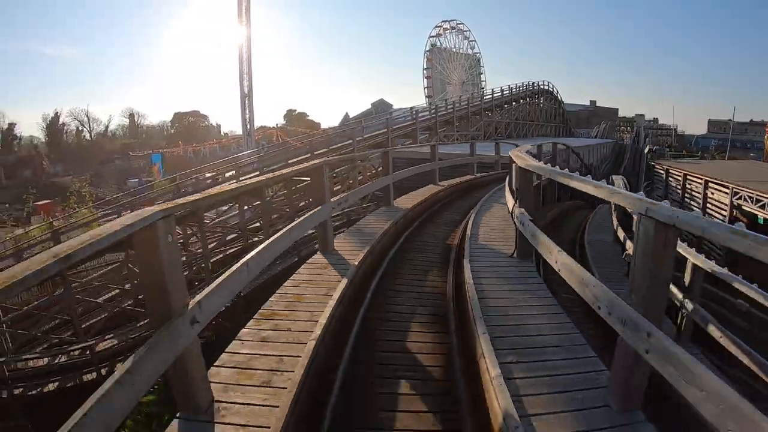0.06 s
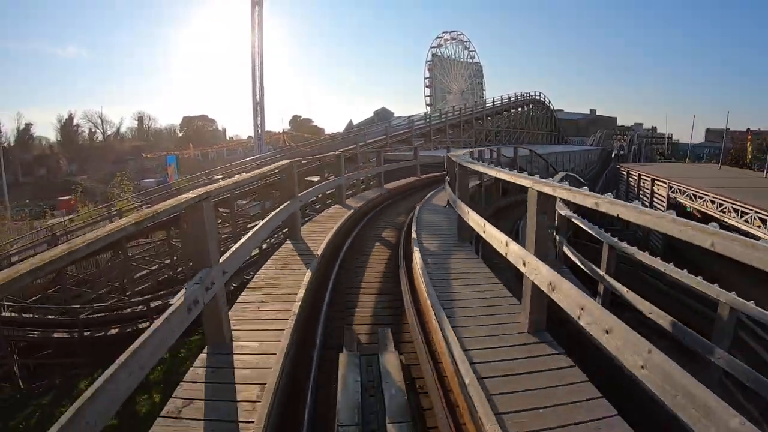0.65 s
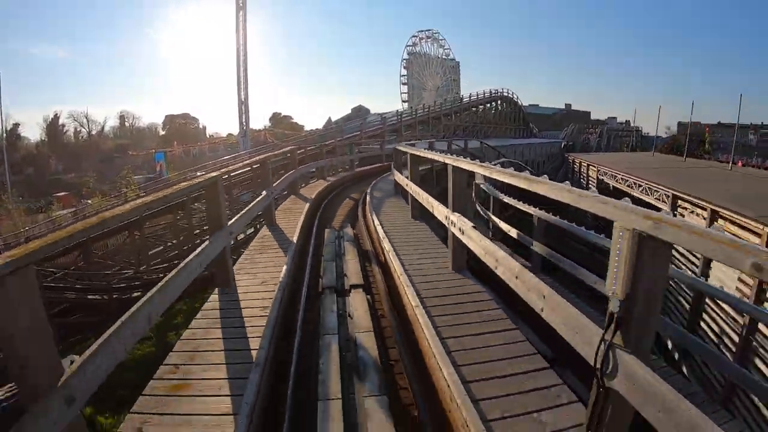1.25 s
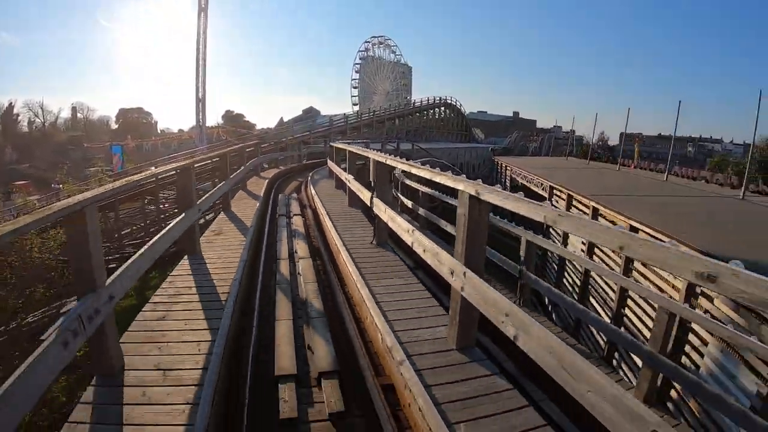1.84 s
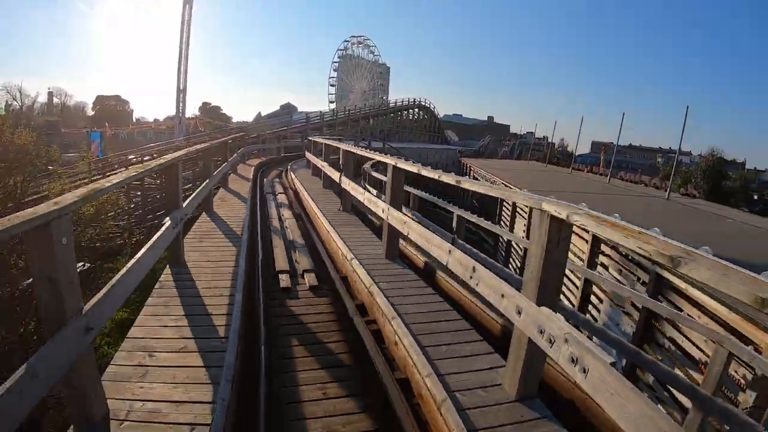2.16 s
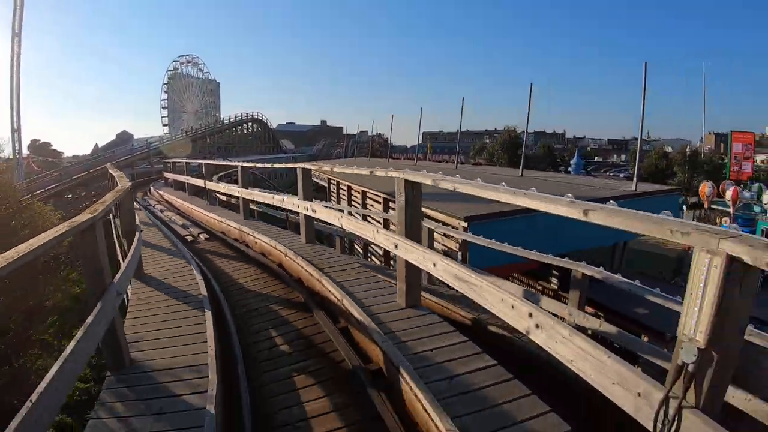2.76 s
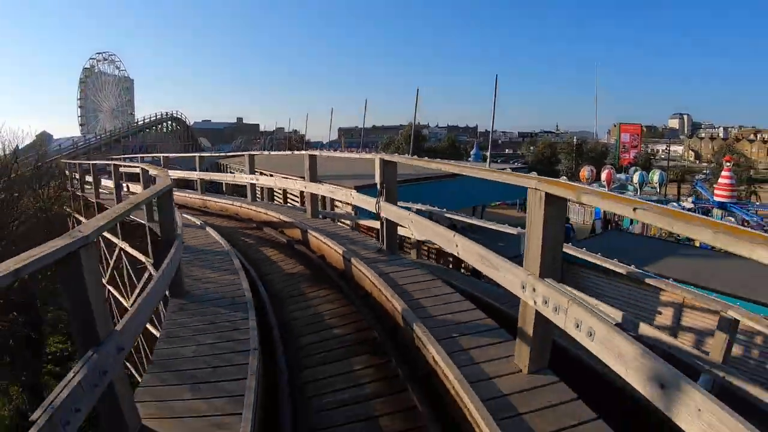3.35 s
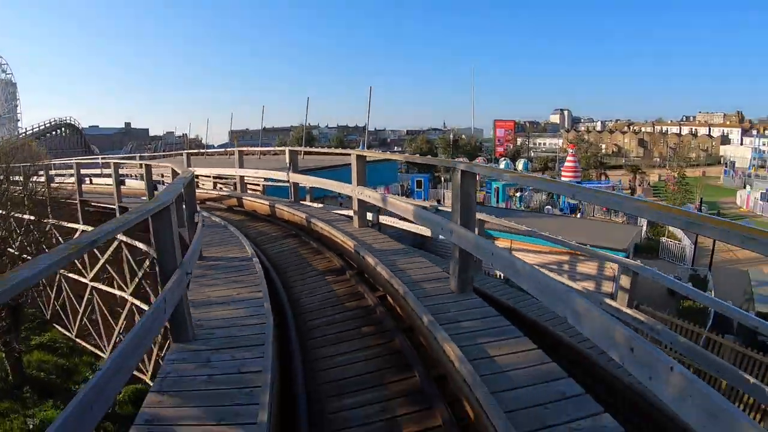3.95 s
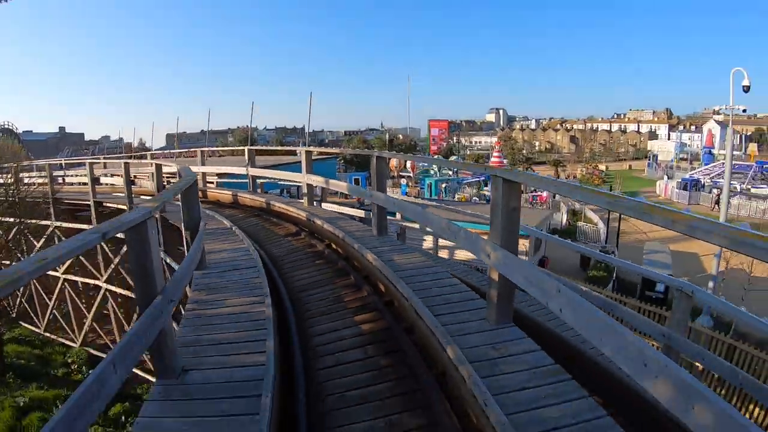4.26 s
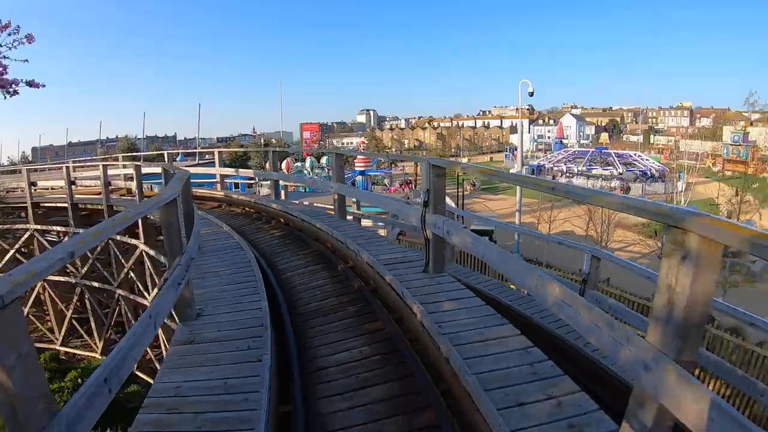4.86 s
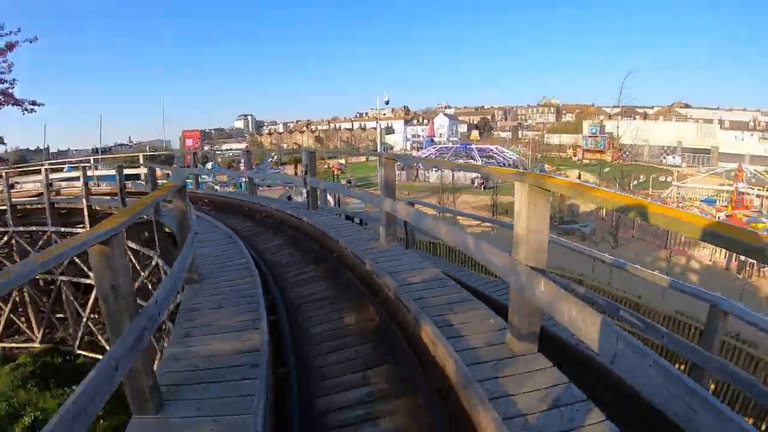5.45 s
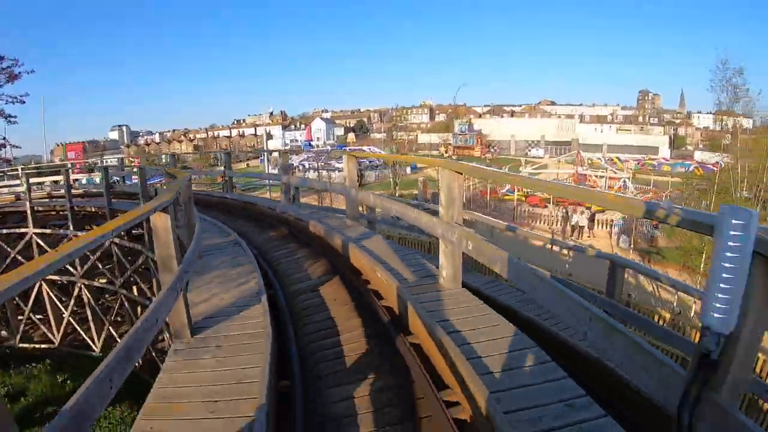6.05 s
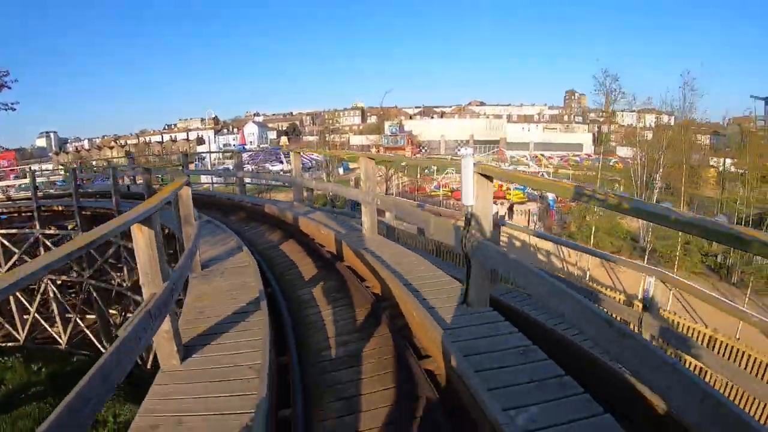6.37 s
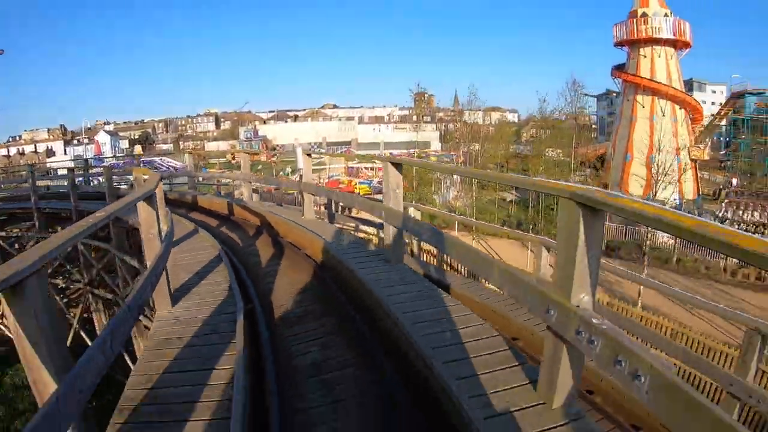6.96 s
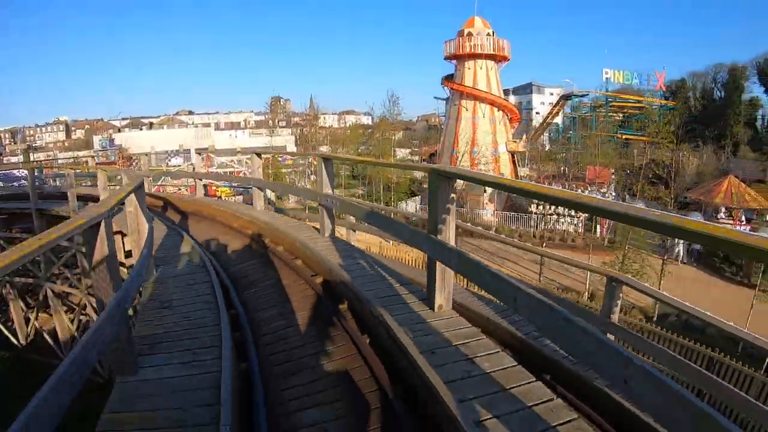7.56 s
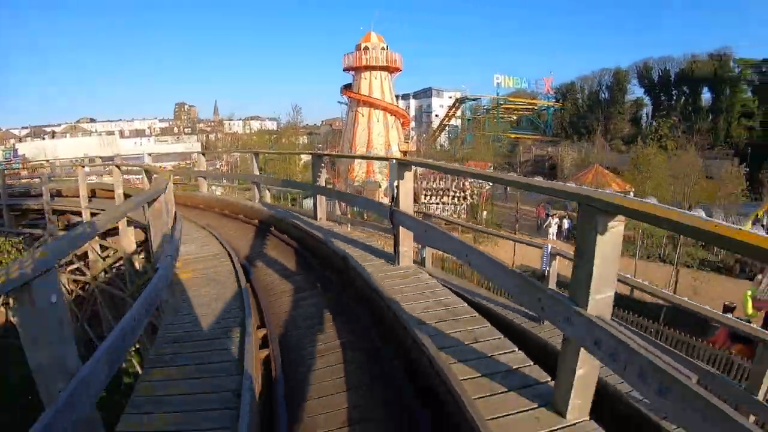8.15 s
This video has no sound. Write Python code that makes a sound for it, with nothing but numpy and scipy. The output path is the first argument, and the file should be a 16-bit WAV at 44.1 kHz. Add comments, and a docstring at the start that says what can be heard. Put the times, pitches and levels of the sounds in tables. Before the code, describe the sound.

From start to finish, about eight seconds, a wooden roller coaster car rumbles along its track, heard from on board in the open air. A hollow, juddering boom from the car's body sits under the gritty roar of steel wheels, and low gusts thud on the microphone, calmer from about 2.3 to 5.5 seconds. Irregular wooden clacks come several times a second, strongest near 0.2, 0.7, 1.7 and 7.6 seconds. Loose metal fittings tick and rattle lightly, most around 1.2 to 2 seconds, where a faint steel sizzle also appears. A wheel gives one brief squeak at the very start. From about 3 seconds it squeals on the bend in fluttering spurts, holding nearly one high pitch. The squeal is loudest from 6 to 7.2 seconds, then weakens and lingers while the rumble and wind continue to the end.

```python
"""Buffeting air, a hollow boom and a juddering wheel roar: the front seat of a wooden roller coaster.
Eddies thud on the microphone, the track shakes the car's body, and steel wheels grind on the rails.
The car clacks over the track while loose fittings rattle and tick and brushing steel sizzles.
Round the bend a wheel flange sticks and slips on the curved rail, squealing in spurts."""
import sys
import numpy as np
from scipy import signal
from scipy.fft import rfft, irfft, next_fast_len
from scipy.io import wavfile
from scipy.ndimage import uniform_filter1d, map_coordinates

SR = 44100
rng = np.random.default_rng(int(sys.argv[2]) if len(sys.argv) > 2 else 0)


def transcribe(u):
    """Save the signal u as a 16-bit wav file named by the first command-line argument.

    u: samples, shape (n,) or (channels, n), limited to [-1, 1]; the rate is SR.
    q: integer samples, one column per channel.
    """
    v = np.clip(np.atleast_2d(u).T, -1, 1)
    q = np.round(v * 32767).astype(np.int16)
    wavfile.write(sys.argv[1], SR, q)


N = 362061

# Tone colours of the noise layers: f/Hz, relative level/dB
BUFFET_SPECTRUM = [(12, -24), (25, -3), (42, 3.5), (70, 2.5), (100, 4.5), (140, -2.5), (400, -58),
                   (1500, -120)]
BOOM_SPECTRUM = [(50, -40), (105, -27.5), (125, -9.5), (145, -3.5), (162, 0.5), (178, -1), (198, 0),
                 (222, -2.5), (245, -5), (278, -10.5), (305, -11.5), (345, -19.5), (450, -21), (600, -30),
                 (1200, -56), (3000, -120)]
PANEL_SPECTRUM = [(180, -29), (260, -4.5), (305, 2), (345, -2), (450, -4), (560, -15), (800, -28.5),
                  (2000, -120)]
ROAR_SPECTRUM = [(150, -24.5), (300, -2), (450, 3.5), (600, -0.5), (820, 2.5), (1050, -1), (1350, -1),
                 (1750, -9.5), (2400, -19.5), (5000, -50.5), (9000, -120)]
GRIND_SPECTRUM = [(500, -14.5), (1000, -1), (1400, 3), (1900, -1.5), (2500, -4), (3200, -8), (4000, -13),
                  (5000, -19), (6000, -31), (7000, -32.5), (9500, -45), (15000, -82)]
RATTLE_SPECTRUM = [(3000, -11), (5500, -1), (6500, -5.5), (7400, 0.5), (7900, 0.5), (8600, -5), (9200, -14),
                   (10000, -16), (11100, -13), (13000, -18), (15500, -35)]
# Air on the microphone, calmer in mid-bend: t/s, level/dB
BUFFET_FADER = [(0, -25.5), (1.1, -24), (1.85, -24), (2.35, -34.5), (2.85, -32.5), (3.6, -35), (3.85, -28),
                (4.1, -31.5), (4.55, -29), (4.7, -34.5), (5.5, -29.5), (5.88, -23.5), (6.03, -30),
                (6.35, -23), (6.75, -23), (7.35, -24.5), (7.6, -28.5), (8.21, -22.5)]
# How hard the track shakes the car's body and its panels: t/s, level/dB
BOOM_FADER = [(0, -21), (.38, -15), (.55, -16.5), (.85, -15.5), (1.05, -18), (2.1, -16.5), (2.3, -14.5),
              (3.7, -16), (4.6, -16), (5.4, -15.5), (6.4, -16.5), (6.62, -18), (6.73, -27.5), (6.83, -19),
              (7.1, -21), (7.4, -19), (7.57, -15.5), (8, -16), (8.21, -22)]
PANEL_FADER = [(0, -33), (0.45, -31), (0.8, -33), (0.95, -24.5), (1.15, -31), (1.5, -36), (1.8, -30),
               (2.45, -26.5), (2.95, -25.5), (3.15, -28), (4.6, -26.5), (4.95, -31.5), (5.07, -20.5),
               (5.3, -28.5), (6.2, -28), (6.5, -34), (7.05, -31.5), (7.6, -30.5), (8.1, -24.5)]
# Wheels on the running rails: t/s, roar level/dB, grind level/dB
WHEEL_FADERS = [(0, -22.5, -30.5), (.25, -24.5, -31), (.7, -28.5, -32.5), (.8, -27, -33.5),
                (1.17, -29, -34), (1.45, -22, -32.5), (1.7, -22, -31.5), (2.25, -22.5, -32),
                (2.7, -25, -33), (3.85, -28, -33.5), (4, -29, -34.5), (4.35, -27, -33.5),
                (5.05, -25.5, -32.5), (5.32, -26, -35.5), (5.45, -24.5, -34.5), (5.7, -27, -32),
                (6.03, -29.5, -35), (6.25, -25.5, -32), (6.42, -24.5, -31.5), (6.5, -30, -34),
                (6.6, -26, -33), (6.75, -28, -33.5), (7.1, -28, -32), (7.35, -26, -31.5),
                (7.72, -29.5, -34), (7.9, -25.5, -32.5), (8.21, -27.5, -33)]
# Bouts of loose fittings rattling: start/s, end/s, level/dB
RATTLE_BOUTS = [(0.05, 0.35, -55.5), (1.2, 1.42, -60.5), (1.65, 2.05, -58.5), (2.54, 2.6, -55),
                (4.15, 4.47, -60.5), (5.5, 5.75, -59), (6.3, 6.45, -60), (6.85, 7.0, -62.5),
                (7.8, 7.95, -61.5)]
# Overlapping swells of band noise: start/s, end/s, f/Hz, half-width/Hz, level/dB
BAND_SWELLS = [(0.0, 0.37, 430, 69, -28.5), (0.102, 1.3, 760, 200, -29.5), (0.0, 0.9, 1760, 290, -36),
               (1.5, 2.06, 1550, 250, -30.5), (2.0, 2.7, 330, 29, -28.5), (2.15, 3.3, 161, 13, -22.5),
               (2.8, 4.3, 182, 17, -21.5), (3.95, 4.8, 154, 12, -21.5), (3, 5.2, 576, 63, -34.5),
               (3.6, 5.95, 372, 81, -31), (6.8, 7.5, 2100, 99, -43), (6.9, 8.0, 142.4, 11, -27),
               (7.498, 7.8, 193, 17, -17)]
# Blows of the track on the car: t/s, level/dB, thud offset/dB, clink offset/dB
CLACK_CUES = [(0.064, -24, 0, -12), (0.210, -14, -5, -9), (0.262, -20.5, 3, -7), (0.576, -21, -4, -4),
              (0.613, -24, 8.5, -10), (0.719, -15.5, -4, -13), (0.935, -25, 7, -16), (1.184, -27, 7, 4),
              (1.422, -22.5, 3.5, -2), (1.647, -20, 4, 0), (1.700, -14, -2.5, -12), (1.766, -28, 3, -11),
              (1.935, -18.5, -2, -6), (2.177, -18, 3.5, -11), (2.241, -21, 3, -9), (2.452, -22.5, 5, -12),
              (2.562, -23, -7, -6), (2.608, -23.5, 3, -15), (2.946, -22, 0, -10), (3.415, -26, 8, -14),
              (3.849, -22, -3, -8), (4.032, -29, 10.5, -6), (4.262, -23, 2, -7), (4.462, -23.5, 0, 4),
              (4.550, -28, 10.5, 2.5), (4.915, -29, -3, -8), (4.937, -21, -9, -12), (5.051, -20, 3, -12),
              (5.088, -23, 4, -15), (5.499, -25.5, 7, -11), (5.645, -20, -4, -6), (5.787, -24.5, 8, -3),
              (5.892, -22, 8, -13), (6.186, -23, 7, -17), (6.530, -23, 5, -5), (6.753, -20, -3, -6),
              (7.435, -19, 1, -11), (7.590, -14, -1, -14), (7.957, -23, 1, -9), (8.157, -24, 3, -14)]
# Close modes of the squealing wheel: f/Hz, relative level/dB
WHEEL_MODES = [(1207, -4), (1226, -7), (1240, 0), (1253, -8), (1266, -1.5), (1278, -7), (1301, -7)]
# Presses of the flange on the rail: start/s, end/s, level/dB, hardest-driven f/Hz
FLANGE_PRESSES = [(0.097, 0.153, -25.5, 1304), (3.21, 3.29, -26.5, 1283), (3.31, 3.37, -25, 1264),
                  (3.446, 3.534, -25.5, 1310), (3.538, 3.6, -23.5, 1260), (3.79, 3.883, -26.5, 1270),
                  (3.923, 4.021, -23, 1273), (4.298, 4.335, -31, 1240), (4.616, 4.827, -27, 1246),
                  (5.196, 5.234, -24.5, 1205), (5.303, 5.316, -20, 1226), (5.367, 5.389, -20.5, 1224),
                  (5.915, 5.95, -24, 1254), (5.984, 6.04, -17.5, 1254), (6.09, 6.133, -19, 1205),
                  (6.204, 6.27, -25, 1223), (6.442, 6.48, -19, 1226), (6.528, 6.602, -20, 1240),
                  (6.617, 6.798, -17, 1250), (6.843, 6.927, -19, 1242), (6.95, 6.98, -22, 1260),
                  (7.022, 7.157, -21.5, 1248), (7.185, 7.3, -25.5, 1240), (8.046, 8.212, -28.5, 1253)]
# Sustained squeal of the flange leaning on the rail: t/s, level/dB
LEAN_FADER = [(2.7, -45), (3.1, -33), (3.3, -30), (4.2, -29.5), (5.4, -30.5), (5.7, -32.5), (5.9, -26),
              (7.2, -28.5), (7.6, -31.5), (7.78, -33.5), (8.21, -30)]
# The fittings' sharpest ticks: t/s, level/dB
TICK_CUES = [(0.3591, -38.5), (0.6823, -40), (1.2096, -40), (1.2211, -36), (1.2401, -38), (1.2796, -27.5),
             (1.3189, -37), (1.6686, -28.5), (1.735, -32), (1.8365, -31.5), (1.8728, -28.5), (1.9033, -31),
             (1.9757, -23.5), (3.548, -38), (4.3475, -35), (4.426, -30.5), (4.467, -36), (4.557, -34.5),
             (4.996, -38.5), (5.0707, -33), (5.1407, -38.5), (5.2445, -37), (5.3867, -38), (5.5009, -39),
             (5.5813, -37), (5.6521, -33), (5.681, -27), (6.3225, -42.5), (6.3747, -32), (6.425, -38),
             (6.4545, -36), (6.772, -37), (6.8973, -32.5), (6.996, -31.5), (7.4393, -27.5), (7.5757, -37),
             (7.6839, -41), (7.8352, -29), (7.9189, -40)]
# Ring of a small metal fitting: f/Hz, relative level/dB, t60/s
FITTING_MODES = [(4820, 10.5, 0.0039), (5630, 1.5, 0.0087), (7340, 1, 0.013), (8260, 1.5, 0.012),
                 (8830, -3.5, 0.015), (11200, -14.5, .006), (12700, -23, .005)]
# Rubs of steel on steel: start/s, end/s, level/dB, top mode's first f/Hz, its last f/Hz
BRUSH_CUES = [(1.25, 1.554, -65, 8830, 8500), (1.852, 2.124, -60, 8700, 8520),
              (2.151, 2.38, -63, 8530, 8400), (7.458, 8.048, -68, 8620, 8540)]
# Modes of the brushed steel before their pitch shift: f/Hz, half-width/Hz, relative level/dB
BRUSH_MODES = [(7450, 300, -8), (8250, 200, -7), (8500, 170, -0.5)]


def amp(db):
    """Decibels to gain."""
    return 10 ** (np.asarray(db) / 20)


def unit(x):
    """Scale to rms 1."""
    return x / np.sqrt(np.mean(x ** 2) + 1e-20)


def curves(rows):
    """One per-sample automation curve for each column after the time."""
    times, *columns = np.transpose(rows)
    return [np.interp(np.arange(N) / SR, times, column) for column in columns]


def wobble(rate):
    """A smooth random modulator with rate knots a second."""
    return map_coordinates(rng.standard_normal(int(N * rate / SR) + 4), [np.arange(N) * rate / SR])


def filtered(x, response):
    """Equalise x with a gain given as a function of frequency."""
    size = next_fast_len(N + SR // 2)
    return irfft(rfft(x, size) * response(np.fft.rfftfreq(size, 1 / SR)), size)[:N]


def noise(spectrum, grit=0):
    """White noise plus any grit, shaped by a spectrum on a log frequency axis, at rms 1."""
    points_hz, db = np.transpose(spectrum)
    source = rng.standard_normal(N) + grit
    return unit(filtered(source, lambda hz: amp(np.interp(np.log(hz + 1), np.log(points_hz), db))))


def resonance(centre_hz, half_width_hz):
    """A resonant band of noise, at rms 1."""
    white = rng.standard_normal(N)
    return unit(filtered(white, lambda hz: 1 / (1 + ((hz - centre_hz) / half_width_hz) ** 2)))


def steady(x, seconds):
    """Level out the slow swells of x, holding it near rms 1."""
    size = max(int(seconds * SR), 8)
    power = uniform_filter1d(uniform_filter1d(x ** 2, size), size)
    return x / np.sqrt(np.abs(power) + 1e-12)


def patchy(x, depth_db):
    """Let the colour of x drift over a few hundred Hz and a tenth of a second, at rms 1."""
    spectrogram = signal.stft(x, nperseg=1024)[2]
    drift = rng.standard_normal(spectrogram.shape)
    for _ in range(2):
        drift = uniform_filter1d(uniform_filter1d(drift, size=5, axis=0), size=9, axis=1)
    return unit(signal.istft(spectrogram * amp(depth_db * unit(drift)), nperseg=1024)[1][:N])


def impacts(per_second, spread_db):
    """Tiny random impacts of varying size, at rms 1."""
    struck = rng.random(N) < per_second / SR
    polarity = np.sign(rng.standard_normal(N))
    return unit(struck * polarity * amp(spread_db * np.clip(rng.standard_normal(N), -2, 2)))


def swells(rows, rise_s, fall_s):
    """Envelope of cues (start/s, end/s, level/dB): each rises, holds and dies; the loudest wins."""
    t = np.arange(N) / SR
    return np.max([amp(db) * np.exp(-np.maximum(start - t, 0) / rise_s - np.maximum(t - end, 0) / fall_s)
                   for start, end, db, *_ in rows], axis=0)


def judder(rate_hz, drift, uneven):
    """A loosely periodic shake plus the unevenness of the track, at rms 1."""
    turns = np.cumsum(rate_hz * (1 + drift * wobble(8))) / SR
    return unit(np.sin(2 * np.pi * turns) + uneven * (wobble(14) + 4.2 * wobble(60)))


def knock(t60, band_hz, attack_s=0.0025):
    """A fast-dying noise burst in one band, at peak 1; the attack is the contact building up."""
    t = np.arange(SR // 8) / SR
    envelope = (1 - np.exp(-t / attack_s)) * amp(-60 * t / t60)
    bandpass = signal.butter(4, band_hz, "band", fs=SR, output="sos")
    burst = signal.sosfilt(bandpass, envelope * rng.standard_normal(len(t)))
    return burst / np.abs(burst).max()


def add(track, start_s, sound):
    """Mix a sound into the track at start_s."""
    part = track[max(round(start_s * SR), 0):][:len(sound)]
    part += sound[:len(part)]


def air_buffet():
    """Eddies thud on the microphone in low, uneven gusts."""
    level_db, = curves(BUFFET_FADER)
    return amp(level_db + 0.5 + 1.7 * wobble(16)) * steady(noise(BUFFET_SPECTRUM), 0.1)


def car_body(load):
    """The track makes the car's hollow body throb and its panels drum."""
    boom_db, = curves(BOOM_FADER)
    panel_db, = curves(PANEL_FADER)
    rocking = judder(rate_hz=9.7, drift=0.11, uneven=0.19)
    boom = amp(boom_db - 0.5 + 0.87 * load + rocking) * steady(noise(BOOM_SPECTRUM), 0.08)
    panels = amp(panel_db + 1.1 + 1.2 * load) * steady(noise(PANEL_SPECTRUM), 0.076)
    return boom + panels


def wheels(load, looseness):
    """Steel rolls on steel: a roar, a gritty grind and a fine rattle, all pulsing with the load."""
    roar_db, grind_db = curves(WHEEL_FADERS)
    roar = steady(noise(ROAR_SPECTRUM, grit=0.51 * impacts(250, spread_db=2.5)), 0.13)
    grind = noise(GRIND_SPECTRUM, grit=0.61 * impacts(1500, spread_db=3.0))
    rattle = patchy(noise(RATTLE_SPECTRUM, grit=0.86 * impacts(300, spread_db=0.5)), depth_db=2.5)
    chatter = wobble(110)  # loose parts shake in bursts of about ten milliseconds
    bumps = wobble(20)  # rough and smooth patches of rail
    return (amp(roar_db - 0.95 + 0.63 * load + 0.52 * bumps) * roar
            + amp(grind_db + 1.34 + 0.85 * load + 0.53 * bumps + 0.73 * chatter) * grind
            + looseness * amp(-0.4 + 1.7 * load + 0.9 * bumps + 2.0 * chatter) * rattle)


def band_swells(load):
    """Noise bands swell and overlap: low hums in the boom, shifting roar colour, a faint scrape."""
    out, t = np.zeros(N), np.arange(N) / SR
    for start, end, hz, half_width, db in BAND_SWELLS:
        progress = np.clip((t - start) / (end - start), 0, 1)
        swell = np.sqrt(np.abs(np.sin(np.pi * progress)))
        out += amp(db) * swell * steady(resonance(hz, half_width), 0.09)
    return out * amp(1.8 * load)


def clacks():
    """Each blow raps the car's panels, lands a wooden thud and clinks the running gear."""
    out = np.zeros(N)
    for start, db, thud_db, clink_db in CLACK_CUES:
        rap = amp(db - 3.5) * knock(t60=0.051, band_hz=(1420, 2800))
        thud = amp(db + thud_db + 2.0) * knock(t60=0.081, band_hz=(467, 1290))
        clink = amp(db + clink_db - 5.5) * knock(t60=0.055, band_hz=(2970, 5030))
        add(out, start, rap + thud + clink)
    return out


def flange_squeal():
    """Stick and slip drive close, beating wheel modes, favouring those near the driven pitch."""
    start, end, _, pitch_hz = np.transpose(FLANGE_PRESSES)
    presses = swells(FLANGE_PRESSES, rise_s=0.012, fall_s=0.027)
    lean_db, = curves(LEAN_FADER)
    lean = amp(lean_db + 2 * wobble(21))
    driven_hz, = curves(np.transpose([(start + end) / 2, pitch_hz]))
    reach_hz = 45  # modes this far from the driven pitch get half the drive
    tone = np.zeros(N)
    for hz, db in WHEEL_MODES:
        drive = amp(db) / (1 + ((hz - driven_hz) / reach_hz) ** 2)
        tone += drive * steady(resonance(hz, half_width_hz=2.76), 0.12)
    rasp = 0.47 * resonance(1250, half_width_hz=40)
    flutter = amp(0.7 * wobble(26) + 0.5 * wobble(70))  # the grip catches and lets go
    squeal = steady(tone + rasp, 0.024)  # friction holds the ringing to a steady size
    return np.hypot(presses, lean) * flutter * squeal


def fitting_ticks(looseness, light_ticks_per_s=14):
    """Each tick rings small metal parts at new strengths; light ticks crowd into the rattling bouts."""
    out, t = np.zeros(N), np.arange(SR // 25) / SR
    hz, mode_db, t60 = np.transpose(FITTING_MODES)[:, :, None]
    lowpass = signal.butter(2, 9000, fs=SR, output="sos")
    struck = np.flatnonzero(rng.random(N) < light_ticks_per_s / SR * looseness / looseness.mean())
    light_db = 20 * np.log10(looseness) + 14 + 2.5 * rng.standard_normal(N)
    for start, db in [*TICK_CUES, *zip(struck / SR, light_db[struck])]:
        decays = amp(mode_db + 2.0 * rng.standard_normal(hz.shape) - 60 * t / t60)
        ring = np.sum(decays * np.sin(2 * np.pi * (hz * t + rng.random(hz.shape))), axis=0)
        click = 1.3 * amp(-60 * t / 0.006) * rng.standard_normal(len(t))
        tick = signal.sosfilt(lowpass, ring + click)
        add(out, start, amp(db + 2.5) * tick / np.abs(tick).max())
    return out


def steel_sizzle():
    """Light, unsteady rubbing keeps high steel modes ringing; their pitch sags through each rub."""
    ring = unit(sum(amp(db) * resonance(hz, half_width) for hz, half_width, db in BRUSH_MODES))
    top_mode_hz, = curves([point for start, end, _, first_hz, last_hz in BRUSH_CUES
                           for point in ((start, first_hz), (end, last_hz))])
    shift_hz = top_mode_hz - BRUSH_MODES[-1][0]  # all modes slide together
    sag = np.exp(2j * np.pi * np.cumsum(shift_hz) / SR)
    sagging_ring = np.real(signal.hilbert(ring, next_fast_len(N))[:N] * sag)
    flicker = amp(1.8 * wobble(22) + 2.2 * wobble(170))
    return swells(BRUSH_CUES, rise_s=0.04, fall_s=0.07) * flicker * sagging_ring


def scene():
    """A mono mix riding with the car in open air; one wheel load pulses body, wheels and band swells."""
    load = judder(rate_hz=16.0, drift=0.072, uneven=0.46)
    bouts = swells(RATTLE_BOUTS, rise_s=0.03, fall_s=0.062)
    looseness = np.hypot(amp(-62.5), bouts)  # a faint rattle carries on between bouts
    bed = air_buffet() + car_body(load) + wheels(load, looseness) + band_swells(load)
    return (bed + clacks() + flange_squeal() + fitting_ticks(looseness) + steel_sizzle())[None]


def record(dry, cutoff_hz=15500):
    """A brick-wall low-pass takes off the very top of the mix."""
    return filtered(dry[0], lambda hz: hz < cutoff_hz)[None]


dry = scene()
out = record(dry)
transcribe(out)
```